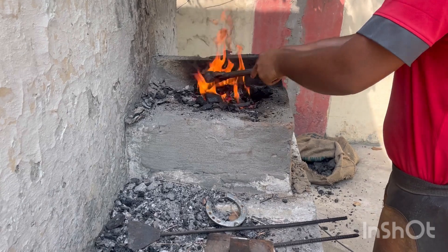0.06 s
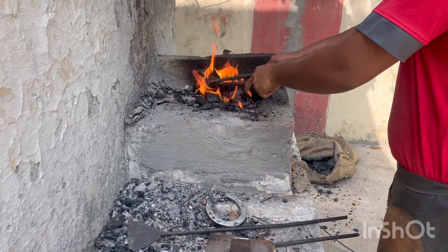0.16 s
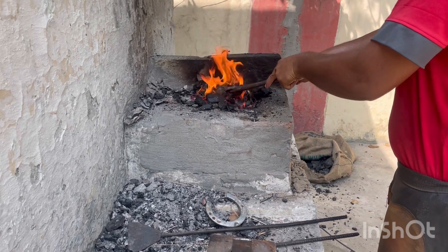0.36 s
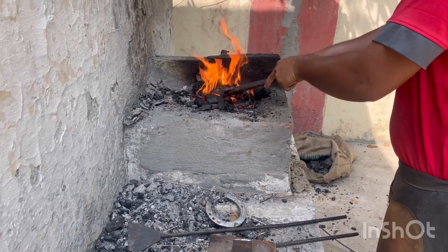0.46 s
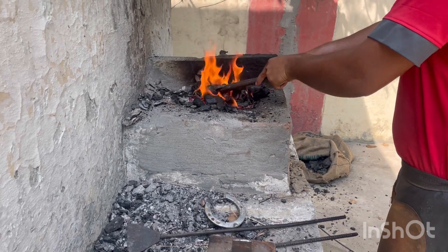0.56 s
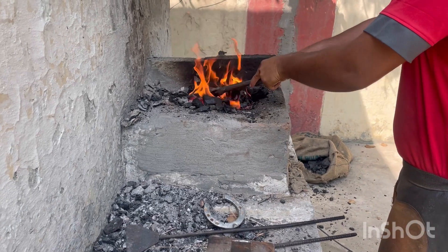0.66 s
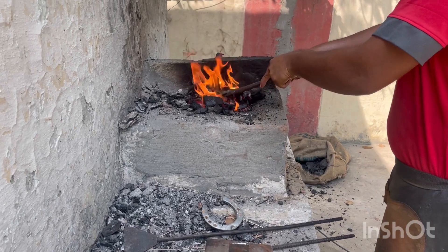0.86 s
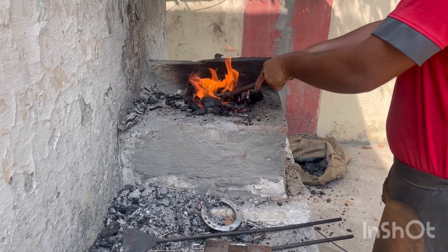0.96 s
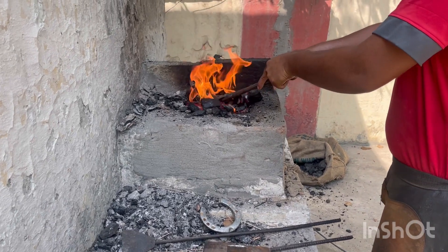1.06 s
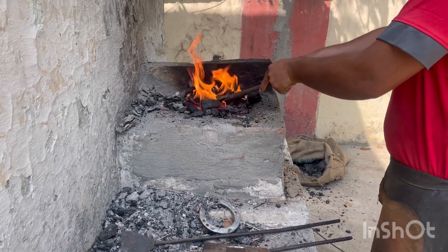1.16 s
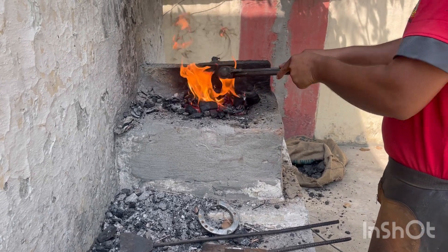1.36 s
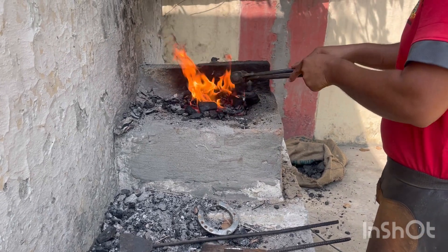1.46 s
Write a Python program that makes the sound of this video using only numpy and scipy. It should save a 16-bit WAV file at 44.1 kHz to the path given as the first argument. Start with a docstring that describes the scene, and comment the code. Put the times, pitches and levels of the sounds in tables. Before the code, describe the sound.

Close up in an open workshop, coals crunch and scrape as iron tongs stir a forge fire. A sharp metal clink and a softer one come early, then fluttering flames and faint ticks, with a low blower drone underneath.

```python
"""Iron tongs rake into the crunching coals of a forge, and the stirred flames flutter up.
A third of a second in, the tongs clink hard on a horseshoe and thump the coal bed; a lighter clink follows.
The raking goes on, the fire flares again, and a few faint clinks and ticking coals close the scene.
A low drone, probably the air blower, runs underneath throughout. The walls of the open workshop
answer briefly, and two close microphone ports pick it all up."""
import sys
import numpy as np
from scipy import signal
from scipy.fft import rfft, irfft, next_fast_len
from scipy.io import wavfile
from scipy.ndimage import uniform_filter1d, map_coordinates

SR = 44100
rng = np.random.default_rng(int(sys.argv[2]) if len(sys.argv) > 2 else 0)


def unload_wav(signal):
    """Save mono or channel-first audio to the path in sys.argv[1] as 16-bit WAV at rate SR, clipped to [-1, 1]."""
    wavfile.write(
        sys.argv[1],
        SR,
        np.round(np.clip(np.atleast_2d(signal).T, -1, 1) * 32767).astype(np.int16),
    )


N = 66150


def clinks():
    """Each contact grinds for an instant, rings tongs and horseshoe, and sets loose coal trickling."""
    # iron on iron: (time [s], handle gain [dB], jaw gain [dB], horseshoe gain [dB], grit gain [dB],
    # treble tilt [dB/octave], grinding time [s])
    contacts = [(.0848, -75, -71, -76, -58, -8.5, 0.0082), (.0922, -77, -54, -94, -58.5, 3, 0.0035),
                (.3308, -37, -50, -33.5, -39, 4, 0.0021), (.4645, -50, -68, -56, -52.5, -2.5, 0.0014),
                (1.113, -78, -71, -78.5, -77, -6, 0.0045), (1.2054, -76.5, -83.5, -74, -72.5, -8.5, .006),
                (1.2902, -75.5, -56, -72, -64, -8, 0.0032),
                (1.3055, -79, -70.5, -79.5, -62.5, -9.5, 0.00064)]
    # modes of the handles, the jaws and the coal-damped horseshoe: (frequency [Hz], gain [dB], t60 [s])
    handle_modes = [(1880, -8, .04), (2670, -2.5, .035), (3280, -3, .036), (4190, -14, .04),
                    (4940, -3, .03), (5660, -10, .04), (6630, -7, .04), (6875, 1, .038), (8680, -4, .045),
                    (9000, -7, .03), (9665, 2, .033)]
    jaw_modes = [(3183, -6, .04), (4990, -4, 0.046), (5470, -6.5, .035)]
    shoe_modes = [(2375, -4, .025), (2713, -10, .06), (3710, -4, .035), (4480, -2, .03), (4772, -8, .035),
                  (4980, 0, .025), (7190, -10, .045), (7750, -4, .03), (9880, -3, .028), (10700, -7, .028),
                  (11045, -1.5, .032), (11590, -7, .042), (13450, -8, .02), (14000, -8, .018)]
    # bright grit of the contact: (frequency [Hz], relative density [dB])
    grit_spectrum = [(300, -26.5), (1200, -10), (2400, -6), (3000, -5.5), (5000, 0), (11000, -3),
                     (12600, -14), (15500, -6.5)]
    out = np.zeros((2, N))
    for start, handle_db, jaw_db, shoe_db, grit_db, tilt_db, hold in contacts:
        t = since(start)
        for modes, db in (handle_modes, handle_db), (jaw_modes, jaw_db), (shoe_modes, shoe_db):
            out += amp(db) * iron_ring(modes, t, hold, tilt_db)
        scrape = strike(t, hold, t60=0.057)
        trickle = amp(-19) * strike(t, hold, t60=0.3)
        out += amp(grit_db) * (scrape + trickle) * noise(grit_spectrum)
    return out


def iron_ring(modes, t, hold, tilt_db):
    """Iron modes, driven while the contact grinds and then dying fast; phase jitter roughens them."""
    out = np.zeros(N)
    for hz, db, t60 in modes:
        phase = 2 * np.pi * (hz * t + rng.random()) + 0.35 * wobble(300)
        gain = amp(db + tilt_db * np.log2(hz / 5000))
        out += gain * strike(t, hold, t60) * np.sin(phase)
    return out


def thump():
    """The hardest blow shakes the coal bed: one dull, low knock."""
    t = since(0.3355)
    pitch_hz = 160.7
    return amp(-27) * strike(t, hold=0, t60=0.044, attack_s=0.002) * np.sin(2 * np.pi * pitch_hz * t)


def raking():
    """Coals crunch and rub against the moving tongs, and their grains set the iron resonating."""
    # strokes of the tongs: (time [s], gain [dB])
    strokes = [(0, -92), (.078, -80), (.1, -60), (.125, -71), (.168, -74.5), (.192, -62.5), (.22, -64),
               (.24, -59), (.268, -59.5), (.3, -65), (.45, -75.5), (.52, -84), (.615, -63), (.655, -73.5),
               (.75, -64.5), (.8, -64.5), (.87, -73.5), (.94, -70), (1.015, -75.5), (1.038, -63.5),
               (1.09, -67.5), (1.135, -78), (1.165, -74.5), (1.25, -79.5), (1.31, -78), (1.5, -79.5)]
    # crunch of the coals: (frequency [Hz], relative density [dB])
    crunch_spectrum = [(150, 3.5), (400, 5.5), (700, 7), (1300, 1.5), (2200, 2), (3400, -1.5), (5000, 0),
                       (6500, -2), (10000, -0.5), (12500, -6), (15500, -2.5)]
    # resonances of the rubbed tongs: (frequency [Hz], width [Hz], relative level [dB])
    resonances = [(2510, 143, 2.5), (4250, 160, -6.5), (5070, 220, -1.5), (6630, 250, -6)]
    grains_per_s, spread_db, cap_db = 1500, 5.5, 7.5
    size_db = np.minimum(spread_db * rng.standard_normal(N), cap_db)
    onsets = rng.random(N) < grains_per_s / SR
    grains = onsets * amp(size_db) * np.sign(rng.standard_normal((2, N)))
    crunch = amp(-1.5) * coloured(grains, crunch_spectrum)
    rub = amp(0.5) * noise(crunch_spectrum)
    iron = lambda f: sum(amp(db) * 1j * f * width / (hz * hz - f * f + 1j * f * width)
                         for hz, width, db in resonances)
    ringing = amp(-10.5) * unit(diffuse(filtered(grains, iron)))
    return amp(curve(strokes)) * (crunch + rub + ringing)


def coal_ticks():
    """Single coals tick in tiny, crisp bursts of noise."""
    # ticking coals: (time [s], gain [dB])
    ticks = [(0.1714, -47.5), (0.5404, -51.5), (1.375, -53.5), (1.402, -56), (1.4263, -53)]
    # colour of a tick: (frequency [Hz], relative density [dB])
    tick_spectrum = [(500, -16), (2500, 0), (10000, 9.5), (15500, 2)]
    bursts = sum(amp(db) * strike(since(start), hold=0, t60=0.0088) for start, db in ticks)
    return bursts * noise(tick_spectrum)


def flames():
    """A low flutter that flares as the fire is stirred."""
    # flares of the fire: (time [s], level [dB])
    flares = [(0, -74.5), (.16, -63.5), (.2, -53), (.29, -44.5), (.32, -51), (.37, -58), (.43, -63),
              (.55, -68.5), (.62, -57), (.68, -58.5), (.735, -46.5), (.765, -54), (.805, -40.5), (.85, -58),
              (.89, -58), (.945, -44), (1.01, -57), (1.05, -53.5), (1.16, -63), (1.3, -80), (1.5, -75)]
    # soft, bassy body of the flames: (frequency [Hz], relative density [dB])
    flutter_spectrum = [(30, -28.5), (80, -12), (125, -1), (165, 0), (235, -4.5), (320, -16), (440, -26),
                        (650, -20.5), (1000, -45.5), (2500, -50)]
    flutter = noise(flutter_spectrum)
    power = uniform_filter1d(np.mean(flutter ** 2, axis=0), size=1500)
    steady = flutter / np.sqrt(np.abs(power) + 1e-6)  # evened out, so the flares shape the swells
    return amp(curve(flares)) * steady


def drone():
    """A low hum, probably the air blower, wavering in pitch and level."""
    # swell of the hum: (time [s], level [dB])
    swell = [(0, -57), (.35, -55), (.7, -61.5), (1, -61.5), (1.3, -60), (1.5, -72.5)]
    pitch_hz, waver_hz, waver_db = 65.6, 1.64, 1.4
    phase = 2 * np.pi * np.cumsum(pitch_hz + waver_hz * wobble(14)) / SR
    return amp(curve(swell) + waver_db * wobble(27)) * unit(np.sin(phase))


def yard_air():
    """The air of the yard: a faint, steady bed of rumble."""
    # colour of the air: (frequency [Hz], relative density [dB])
    air_spectrum = [(20, -5), (35, -8.5), (80, 5), (120, -4), (250, -16.5), (600, -22), (1300, -31),
                    (2200, -37.5), (3200, -45), (9000, -42), (15500, -47.5)]
    return amp(-62.5) * noise(air_spectrum)


def workshop(x):
    """The walls answer with a short tail in which each frequency dies at its own speed."""
    # decay of the room: (frequency [Hz], t60 [s])
    decay_times = [(150, 0.15), (2000, 0.44), (7000, 0.45), (11000, 0.29), (15000, 0.21)]
    hz, t, spectra = signal.stft(rng.standard_normal((2, SR // 2)), SR, nperseg=256)
    decay = np.exp(-np.log(1000) * t / along(decay_times, hz)[:, None])
    tail = signal.istft(spectra * decay, SR, nperseg=256)[1]
    tail /= np.linalg.norm(tail[0])
    return diffuse(signal.fftconvolve(x.mean(axis=0)[None], tail, axes=1)[:, :N])


def diffuse(pair):
    """Two unrelated signals blended into left and right, widest in the midrange."""
    # likeness of left and right: (frequency [Hz], correlation [0-1])
    likeness = [(60, 1), (300, 0.95), (700, 0.55), (1500, 0.21), (3600, 0.68), (5700, .6), (8000, 1),
                (15000, 0.97)]
    angle = lambda hz: np.arccos(np.clip(along(likeness, hz), -1, 1)) / 2
    mid, side = filtered(pair, lambda hz: np.array([np.cos(angle(hz)), np.sin(angle(hz))]))
    return np.array([mid + side, mid - side])


def coloured(pair, spectrum):
    """Stereo sound of rms 1, shaped by the given spectrum."""
    return unit(diffuse(filtered(pair, lambda hz: amp(along(spectrum, hz)))))


def noise(spectrum):
    """Coloured stereo noise of rms 1."""
    return coloured(rng.standard_normal((2, N)), spectrum)


def filtered(x, response):
    """x through a complex frequency response."""
    size = next_fast_len(N + SR // 2)
    return irfft(rfft(x, size) * response(np.fft.rfftfreq(size, 1 / SR)), size)[..., :N]


def strike(t, hold, t60, attack_s=0.00048):
    """Attack, hold and release of a contact, all in seconds."""
    return (1 - np.exp(-t / attack_s)) * np.exp(-np.log(1000) * np.maximum(t - hold, 0) / t60)


def since(start):
    """Seconds since start, zero before it."""
    return np.maximum(np.arange(N) / SR - start, 0)


def wobble(rate):
    """A smooth random curve, rate knots a second."""
    return map_coordinates(rng.standard_normal(int(N * rate / SR) + 4), [np.arange(N) * rate / SR])


def curve(rows):
    """One value per sample from (time [s], value) rows."""
    return np.interp(np.arange(N) / SR, *np.transpose(rows))


def along(points, hz):
    """The value at hz between (frequency [Hz], value) points on a log axis."""
    freqs, values = np.transpose(points)
    return np.interp(np.log(hz + 1), np.log(freqs + 1), values)


def amp(db):
    """Decibels to gain."""
    return 10 ** (np.asarray(db) / 20)


def unit(x):
    """Scaled to rms 1."""
    return x / np.sqrt(np.mean(x ** 2) + 1e-20)


def scene():
    """Iron and coals in the workshop, over fire, drone and air."""
    work = clinks() + thump() + raking() + coal_ticks()
    return work + amp(-18.5) * workshop(work) + flames() + drone() + yard_air()


def record(dry):
    """Two close ports hear the forge slightly apart in phase and level, with the very top cut off."""
    # lead of the left port: (frequency [Hz], phase [rad])
    left_lead = [(0, 0), (900, .4), (4000, .1), (5200, .7), (7000, -1.4), (8100, -3.14), (11200, -6.28),
                 (12200, -6.28), (14600, -9.42)]
    balance_db, top_hz = [[0.3], [-0.3]], 15800
    ports = lambda hz: np.exp(1j * np.array([[1], [0]]) * np.interp(hz, *np.transpose(left_lead)))
    return filtered(dry * amp(balance_db), lambda hz: ports(hz) * (hz < top_hz))


dry = scene()
out = record(dry)
unload_wav(out)
```